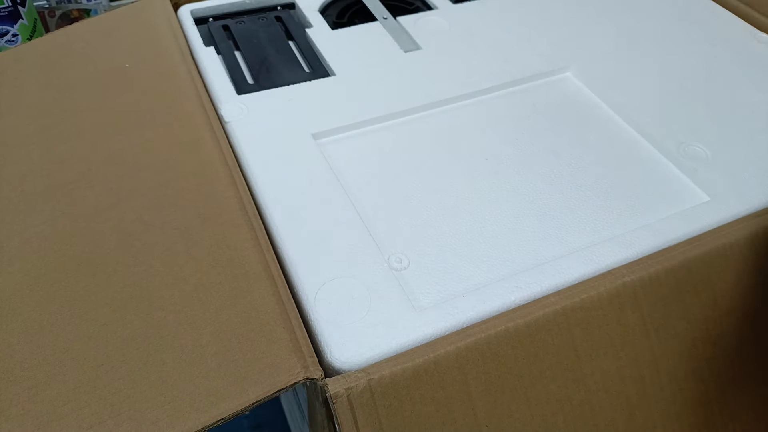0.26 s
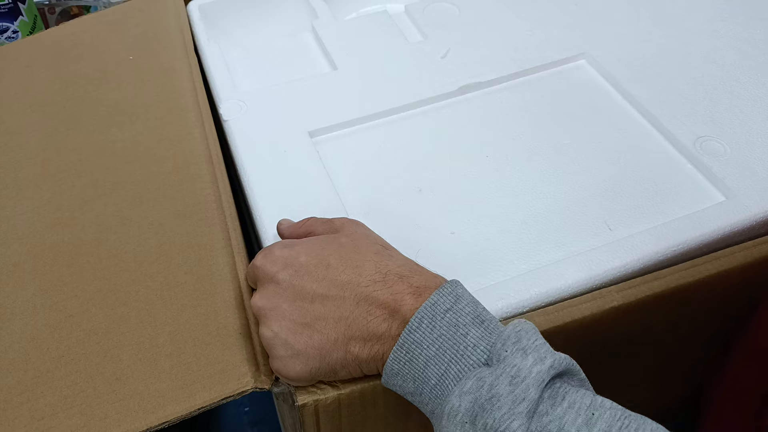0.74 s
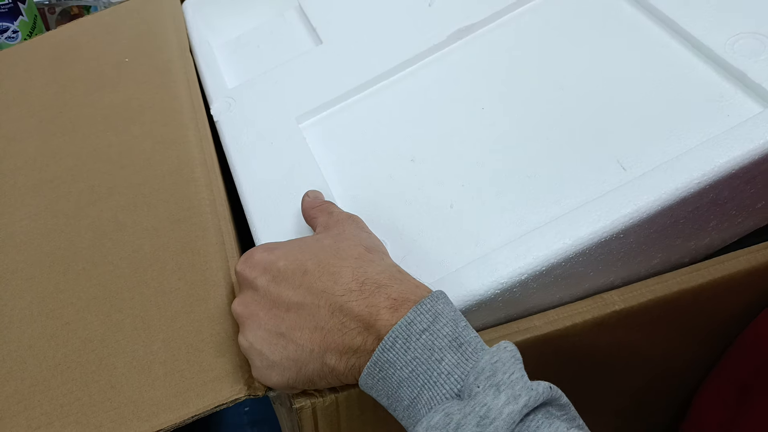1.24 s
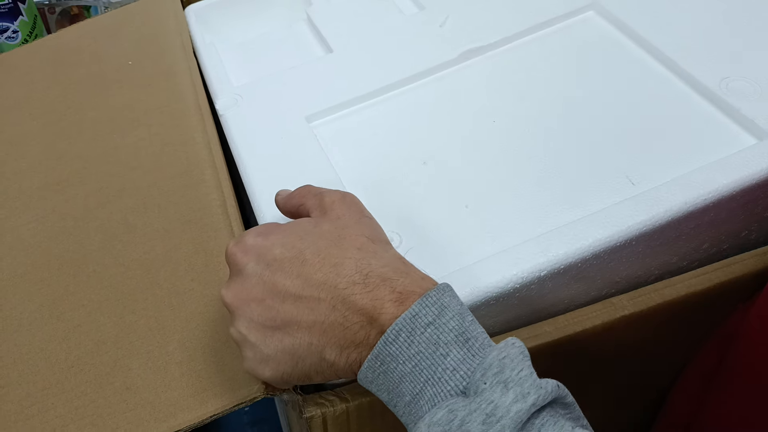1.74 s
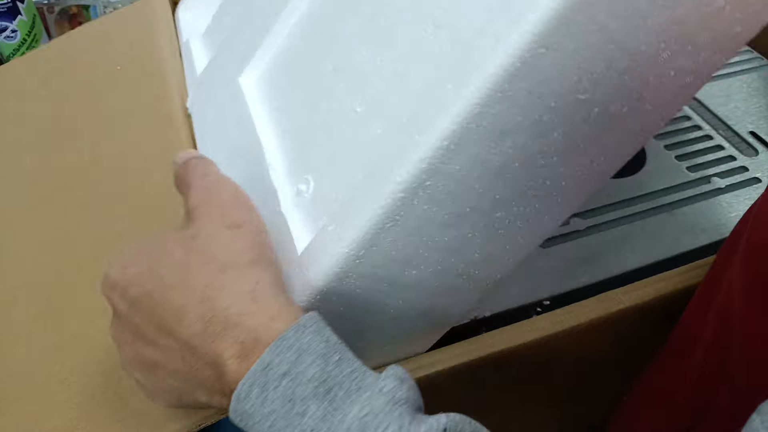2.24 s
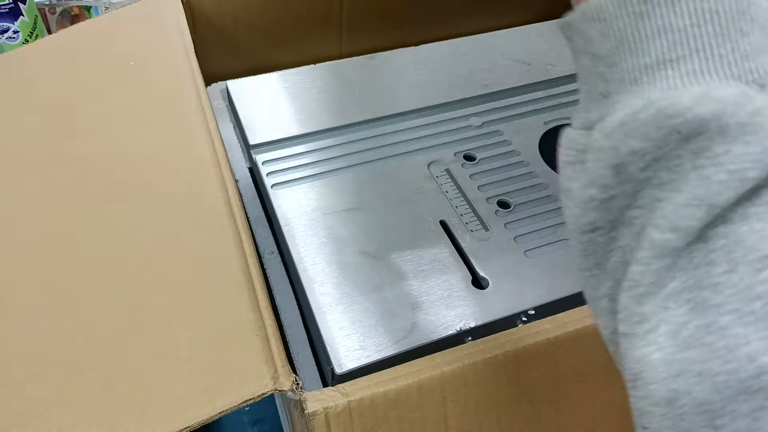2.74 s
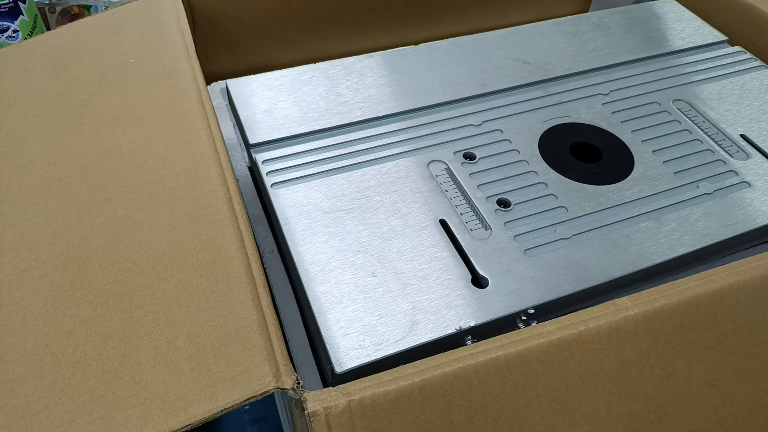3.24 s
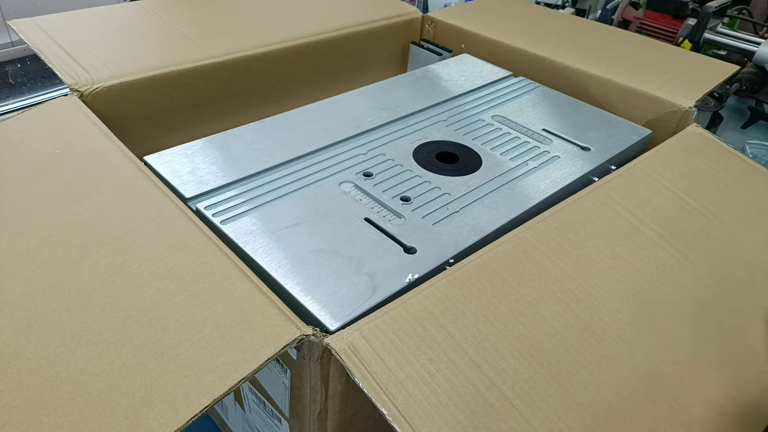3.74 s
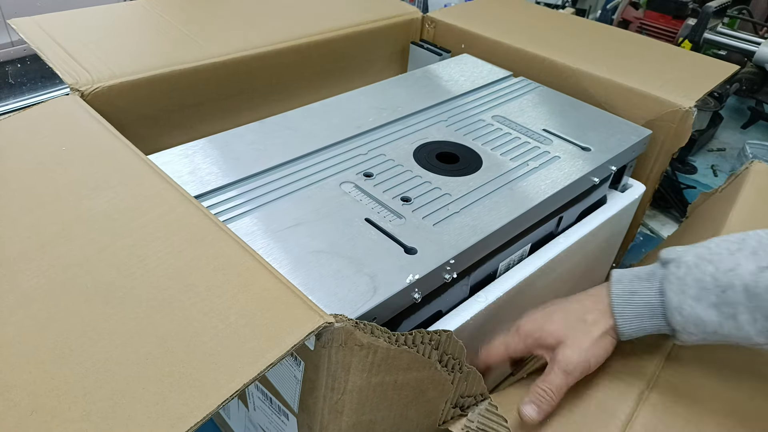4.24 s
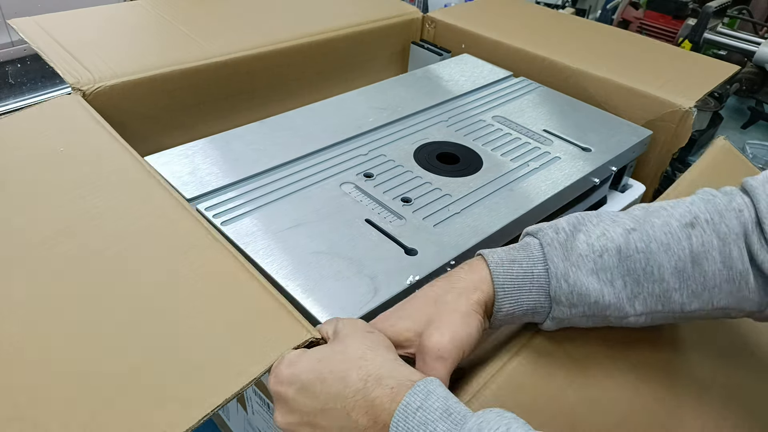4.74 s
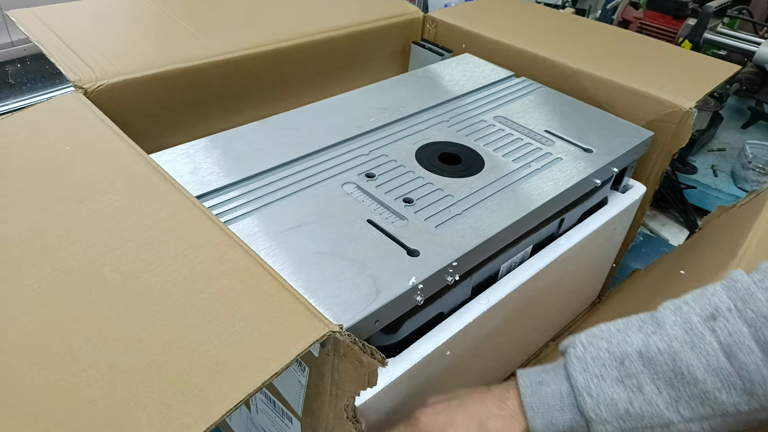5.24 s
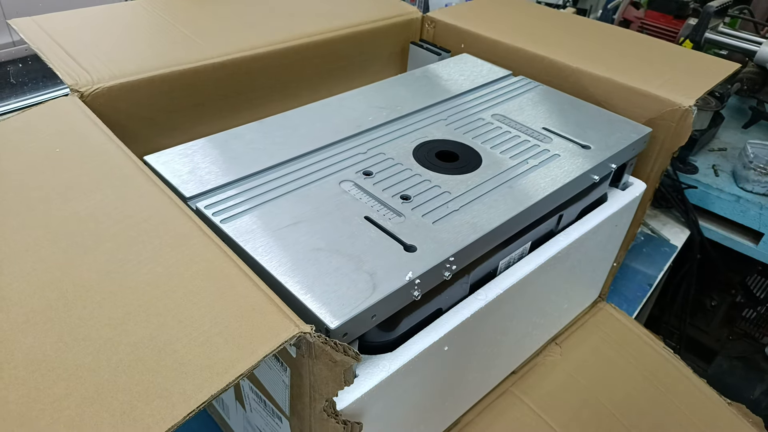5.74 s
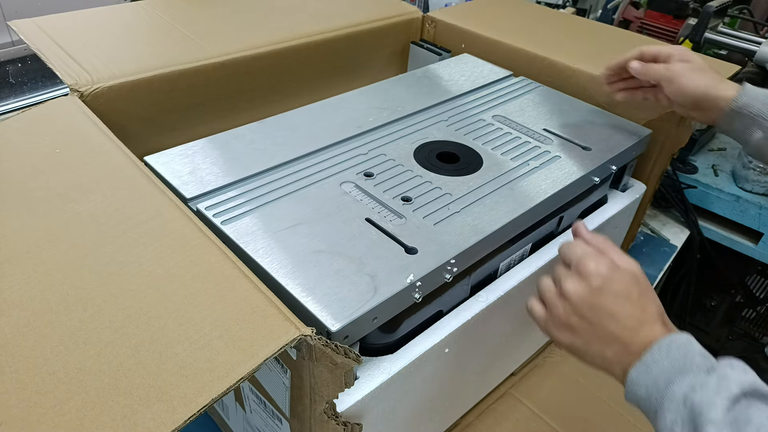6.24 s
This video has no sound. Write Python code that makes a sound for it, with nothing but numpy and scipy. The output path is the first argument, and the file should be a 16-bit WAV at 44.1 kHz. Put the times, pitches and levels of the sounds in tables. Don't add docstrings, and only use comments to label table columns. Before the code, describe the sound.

Dry, squealing foam scrapes free of a hollow box and drops with clattering thuds; after a brief hush, a torn cardboard side is bent and pressed.

```python
import sys
import numpy as np
from scipy import signal
from scipy.fft import rfft, irfft, next_fast_len
from scipy.io import wavfile
from scipy.ndimage import uniform_filter1d

SR = 44100
rng = np.random.default_rng(int(sys.argv[2]) if len(sys.argv) > 2 else 0)


def invert_db(x):
    u = np.asarray(x, float) / 20
    return 10 ** u


def inscribe(sig):
    pcm = np.round(np.clip(np.atleast_2d(sig).T, -1, 1) * 32767)
    wavfile.write(sys.argv[1], SR, pcm.astype(np.int16))


N = 286164
LONG = next_fast_len(N)
BINS_HZ = np.fft.rfftfreq(LONG, 1 / SR)

# start in seconds, fade in seconds, force in dB, body above the force in dB, fizz above it in dB.
JOLTS = [(.081, 0.08, -40, -2, 5.5), (.478, 0.11, -43, 14, 5.5), (.717, 0.14, -27, -10, 7.5),
         (.866, 0.12, -31, -5, 17), (.987, 0.035, -39, -11, 25.5), (1.078, 0.073, -57, 10, 10),
         (1.312, 0.091, -51, 14, 34), (2.15, 0.13, -24.5, -1, 5.5), (2.323, 0.14, -28, -22, -7),
         (2.795, 0.19, -43.5, 15.5, -8), (2.822, 0.12, -38.5, 18, -9), (2.971, 0.13, -23.5, 11, -3),
         (3.231, 0.12, -31, 17.5, -4), (3.525, 0.17, -71.5, 16, 15), (3.737, 0.12, -47, 8, 2.5),
         (3.867, 0.11, -50, 23, -2), (4.29, 0.099, -36, 16, -3), (4.733, 0.05, -33.5, 2, -4),
         (4.921, 0.11, -23, -6, 7.5), (5.262, 0.093, -24, -17, 1), (6.349, 0.28, -56, -6.5, 9),
         (6.46, 0.11, -61, 4, 18)]
# peak time in seconds, then as for the jolts.
PULLS = [(.06, 0.067, -67, 11, 0), (.25, 0.63, -55, 2, 6), (.4, 0.26, -57.5, 11, 9),
         (.733, 0.023, -28, -10, 7), (.8, 0.12, -38, 1.5, 0.5), (.918, 0.12, -18.5, -14, -4.5),
         (.996, 0.012, -35.5, -11, 26.5), (1.03, 0.19, -42, 5.5, 18), (1.133, 0.065, -28, 5.5, 6.5),
         (1.21, 0.26, -43.5, 3.5, 19.5), (1.273, 0.098, -42, -6, 20.5), (1.357, 0.11, -34, -2.5, 18),
         (1.389, 0.11, -33, -21, -3), (1.442, 0.06, -57.5, 21, 0), (1.505, 0.29, -34, -4, 13),
         (1.612, 0.24, -24, -25, 8), (1.675, 0.064, -37, 6, 27.5), (1.765, 0.13, -31, -6.5, 14),
         (1.875, 0.28, -24.5, -16, 9), (1.987, 0.19, -48, -3.5, 34.5), (2.08, 0.15, -38.5, 4.5, 15.5),
         (2.239, 0.22, -24, -10.5, 8), (2.372, 0.25, -23.5, 2.5, -1.5), (2.542, 0.24, -38, -9, 8),
         (2.652, 0.16, -29.5, -2, 4)]
# peak time in seconds, then as for the jolts.
TUMBLES = [
    (2.882, 0.11, -49.5, 32, -17.5),
    (3.02, 0.095, -29, 16.5, -4.5),
    (3.06, 0.12, -43, 28, -6.5),
    (3.133, 0.14, -35.5, 24.5, 2.5),
    (3.3, 0.19, -46, 31, -16),
    (3.383, 0.046, -29, 11, 3.5),
]
# peak time in seconds, then as for the jolts.
FOLDS = [(3.64, 1, -64, 9, 2), (3.905, 0.051, -36.5, 13.5, 2), (3.949, 0.07, -26.5, 2.5, 1),
         (4.011, 0.17, -25.5, -0.5, 3), (4.089, 0.15, -23.5, -3.5, 4.5), (4.149, 0.19, -29.5, -4.5, 2),
         (4.35, 0.14, -44, 13, 8.5), (4.425, 0.18, -32.5, -6.5, 4.5), (4.572, 0.19, -37.5, 3, 3.5),
         (4.845, 0.34, -34.5, -2.5, 5.5), (4.974, 0.18, -23, 2.5, -1.5), (5.049, 0.27, -36, 4.5, 11.5),
         (5.116, 0.1, -42.5, -9, 13.5), (5.2, 0.12, -35.5, 1, -10), (5.301, 0.15, -24, -5, 5),
         (5.345, 0.15, -29, 6, 3.5), (5.49, 0.66, -41.5, -1.5, 8), (5.58, 0.7, -52.5, 9, 8),
         (5.742, 0.11, -38.5, -1.5, 0.5), (5.823, 0.22, -43, -6, 7), (5.96, 0.28, -56.5, 7.5, 6),
         (6.1, 0.25, -73, -15.5, 7), (6.489, 0.06, -48, 4, 2)]
FADE_SHARES = [0.81, 0.75, 0.8]
# time in seconds, thump above the body in dB, left over right in dB.
HANDS = [(0.0, -7, 1), (1.16, -17.5, -1.5), (2.29, -15.5, 1), (2.5, -5, 0.5), (2.71, -12, 0.5),
         (2.78, 4, -1), (2.8, -12.5, -0.5), (3.42, -24, -0.5), (3.85, -2.5, -3), (3.94, -30, 0),
         (4.32, -20.5, 0), (4.6, -11, 0), (5.0, -10.5, 0), (5.35, -24.5, 0), (5.55, -12, -0.5),
         (6.38, -11, -1.5), (6.49, 2.5, -1.5)]
# time in seconds, share of ringing foam 0-1, share of dull side panel 0-1.
SHAKEN = [(0, 0.6, 0.18), (.7, 0, 0.24), (2.7, 0.2, 0.2), (2.8, 0.83, 0.05), (3.4, 0.99, 0.18),
          (3.5, 0, 0.15), (3.75, 0, 0.47), (4.3, 0.1, 0.65), (4.5, 0.35, 0.38), (4.7, 0, 0.16),
          (5.9, 0.4, 0.26)]
# time in seconds, share of thin top fizz 0-1.
SPEED = [(.7, 0.2), (1.0, 0), (1.1, 0.7), (1.2, 0.6), (1.3, 0.85), (1.4, 0.1), (1.46, 1), (1.5, 0.3),
         (1.56, 0.54), (1.62, 0), (1.69, 0.9), (1.76, 0.1), (1.88, 0), (1.95, 0.37), (2.03, 0.7),
         (2.2, 0.03), (2.7, 0.2), (3.5, 0.25)]
# middle in seconds, half length in seconds, change in dB.
LIFTS = [(1.06, 0.0099, 6), (1.225, 0.04, 1), (1.295, 0.035, -16), (1.092, 0.014, -9), (1.33, 0.014, -3),
         (1.468, 0.03, -12), (1.564, 0.026, -12), (1.714, 0.047, -11), (1.776, .012, -7),
         (1.924, 0.029, -6), (2.028, 0.042, -11), (2.143, 0.0058, -5), (2.488, 0.022, -5.5),
         (2.59, 0.014, -6), (2.96, 0.024, -9), (3.21, .014, 2.5)]
# pitch in Hz, level in dB per Hz.
THUMP = [(25, -39), (60, -34.5), (100, -3.5), (130, 3.5), (200, -2.5), (250, -27), (350, -33)]
# pitch in Hz, level in dB per Hz.
BODY = [(150, -47), (230, -3.5), (300, 1), (600, 2), (900, 0), (1300, -5.5), (2000, -13), (3500, -32.5)]
# pitch in Hz, level in dB per Hz.
PANEL = [(110, -27.5), (190, -9.5), (290, 0), (400, -15.5), (560, -23.5), (900, -27.5), (1500, -46)]
# pitch in Hz, level in dB per Hz.
RASP = [(140, -46.5), (700, -10), (1200, -2.5), (1600, -1.5), (3000, -1.5), (5500, -6), (6500, -12),
        (8500, -19)]
# pitch in Hz, level in dB per Hz.
FIZZ = [(4000, -41.5), (6000, -9), (8000, -2), (10500, -1), (13000, -2), (15700, -9), (16100, -46)]
# pitch in Hz, level in dB per Hz.
SHEEN = [(6500, -47), (8500, -14), (10000, -2), (13000, -2.5), (15700, -5.5), (16100, -32)]
# pitch in Hz, width in Hz, height above the body in dB.
HOLLOW = [(160, 18, 12), (295, 24, 13), (409, 14, 17), (540, 14, 16), (667, 14, 16), (837, 14, 16),
          (1098, 20, 12), (1410, 16, 12)]
# pitch in Hz, likeness from -1 to 1.
LIKENESS = [(60, 0.35), (150, 0.97), (380, 0.91), (950, 0.62), (2380, 0.039), (5980, -0.011),
            (15000, -0.17)]
# start in seconds, length in seconds, pitch in Hz, level in dB.
SQUEAKS = [(0.831, 0.025, 9620, -25), (0.874, 0.046, 12460, -20.5), (0.885, 0.036, 8380, -24.5),
           (0.988, 0.06, 4690, -31.5), (1.093, 0.012, 14200, -18.5), (1.37, 0.083, 5620, -31.5),
           (1.187, 0.063, 10500, -34), (1.122, 0.013, 12400, -17.5), (1.165, .01, 11500, -25),
           (1.184, 0.013, 7720, -20), (1.207, 0.05, 7740, -28), (1.182, .08, 5340, -33.5),
           (1.255, 0.06, 6050, -34), (1.319, 0.019, 11600, -19), (1.34, 0.02, 10600, -25),
           (1.387, .009, 5610, -20), (1.664, 0.03, 13490, -11.5), (1.801, 0.019, 5220, -20),
           (1.845, 0.02, 13600, -32), (1.953, 0.037, 10570, -14.5), (2.028, 0.011, 12000, -23.5),
           (2.063, 0.023, 11720, -17.5), (1.746, 0.02, 5420, -23.5), (2.648, 0.017, 13600, -17),
           (2.978, 0.049, 4500, -26)]
# start in seconds, length in seconds, first pitch in Hz, last pitch in Hz, level in dB.
CHIRPS = [(0.86, 0.01, 14330, 4980, -21.5), (1.078, .006, 8830, 15100, -20),
          (1.114, 0.013, 14460, 13500, -19), (1.144, 0.018, 11970, 13100, -20),
          (1.184, 0.01, 11200, 9900, -22.5), (1.25, .011, 13000, 15600, -21),
          (1.267, 0.0088, 8000, 12830, -21), (1.273, 0.012, 12500, 9270, -20),
          (1.31, 0.01, 9190, 11570, -18), (1.354, 0.01, 10500, 3920, -22),
          (1.366, 0.013, 3880, 3020, -25.5), (1.371, 0.055, 3127, 2750, -30),
          (1.381, .012, 3700, 2720, -25), (1.427, 0.017, 7470, 15500, -17.5),
          (1.477, 0.013, 15300, 10360, -22), (1.485, 0.014, 9500, 3870, -23),
          (1.527, 0.013, 8840, 11460, -17), (1.535, 0.0095, 12440, 14100, -20),
          (1.599, 0.018, 1380, 1210, -29.5), (1.611, 0.017, 1138, 980, -24),
          (1.653, 0.014, 10800, 13600, -20.5), (1.691, .01, 13000, 14900, -24),
          (1.695, 0.028, 11660, 10860, -19), (1.716, 0.011, 9960, 7800, -26),
          (1.743, 0.01, 4180, 5670, -27.5), (1.752, .01, 8200, 10700, -27), (1.757, 0.015, 6880, 7510, -20),
          (1.863, 0.028, 3544, 4660, -25), (1.926, 0.025, 4106, 7900, -21),
          (1.945, 0.013, 11000, 13200, -44), (1.978, .012, 12430, 13800, -24),
          (1.98, 0.0086, 11950, 15250, -25), (2.022, 0.0072, 12670, 8200, -23.5),
          (2.04, 0.018, 14160, 10340, -22.5)]
# start in seconds, peak in dB.
SNAPS = [(.0807, -26), (.157, -36), (.4777, -27), (.835, -12), (.9885, -5), (1.0805, 1), (1.119, -6),
         (1.129, -4), (1.1604, -9), (1.315, -20), (1.449, -10), (1.479, -14), (2.1495, 1), (2.186, -6),
         (2.202, -7), (2.234, -6), (2.3235, 3), (2.638, -8), (2.6491, -8), (2.6747, -18), (2.972, -8),
         (2.9863, -3), (3.231, -10)]
# start in seconds, peak in dB.
FIBRES = [(3.741, -30), (3.8977, -17), (3.937, -14), (3.9945, -10), (4.0274, -8), (4.0504, -11),
          (4.0884, -8), (4.417, -14), (4.732, -6), (4.9212, -3), (5.0836, -10), (5.1928, 1), (5.2625, -4),
          (5.2905, -12), (5.8053, -20), (6.0294, -29)]
# start in seconds, peak in dB, pitch in Hz.
KNOCKS = [(0.203, -32.5, 221), (0.278, -19.5, 196), (0.362, -29, 261), (0.477, -11.5, 450),
          (0.883, -13, 796), (1.122, -22, 513), (1.44, -24, 305), (1.672, -23, 209), (2.145, -14, 910),
          (2.324, -10, 926), (2.35, -3.5, 684), (2.885, -15, 560), (3.032, -1, 822), (3.12, -8, 684),
          (3.143, -12, 543), (3.365, -11, 429), (3.248, 0, 838.4)]
# start in seconds, peak in dB, pitch in Hz.
FLAP_KNOCKS = [(3.737, -27.5, 295), (3.865, -19.5, 488), (3.941, -33, 370), (4.292, -5, 340.3),
               (4.733, -21, 680), (4.837, -16, 725), (4.964, -7.5, 547), (5.58, -27, 322.7),
               (5.731, -29, 205), (5.967, -34.5, 137), (6.109, -40.5, 190.7), (6.351, -43, 252),
               (6.459, -42, 145)]
# start in seconds, peak in dB, pitch in Hz.
CRACKS = [(.207, -29.5, 890), (.082, -30, 667), (.72, -24, 795), (.881, -11.5, 597), (.955, -14.5, 757),
          (1.129, -17.5, 595), (1.161, -18.5, 930), (1.45, -22.5, 386), (1.479, -32, 504),
          (1.672, -19.5, 696), (1.748, -27, 394), (1.797, -16.5, 1630), (1.826, -12.5, 1620),
          (2.079, -15.5, 1090), (2.149, -10, 1300), (2.187, -9, 1240), (2.202, -8.5, 1210),
          (2.234, -11, 2420), (2.324, 0.5, 1480), (2.354, -8.5, 697), (2.639, -13, 1440), (2.807, -23, 740),
          (2.827, -26.5, 336), (2.972, -15, 330), (2.974, -12, 1670), (2.989, -3, 2400), (3.229, -10, 368),
          (3.23, -5, 1820), (3.87, -24, 473), (3.898, -18.5, 332), (3.899, -20.5, 1430), (3.94, -13.5, 358),
          (3.995, -14.5, 900), (4.029, -22, 1590), (4.052, -15, 690), (4.301, -8, 378), (4.805, -38, 684),
          (4.922, -21, 1320), (4.93, -8, 720), (4.945, -12, 770), (5.084, -17, 462), (5.193, -23, 547),
          (5.237, -28, 633), (5.263, -10, 2300), (5.297, -11.5, 650), (5.319, -7.5, 1310)]
# start in seconds, length in seconds, pitch in Hz, level in dB.
GROANS = [(1.96, 0.15, 300, -45), (2.26, 0.05, 285, -31), (3.733, 0.082, 275, -40.5),
          (3.976, 0.058, 310, -29), (4.075, 0.071, 300, -32), (4.403, .09, 290, -42.5),
          (5.5, 0.083, 600, -47), (5.617, .14, 610, -43.5), (5.64, 0.14, 310, -50), (5.979, 0.09, 185, -49),
          (6.343, 0.039, 330, -52)]
# pitch in Hz, level in dB per Hz.
HISS = [(30, -32.5), (71, -10), (170, -14.5), (400, -24), (800, -27.5), (1300, -19), (5500, -25.5),
        (9000, -17.5), (16000, -17)]
# start in seconds, end in seconds, level in dB.
HUSH = (3.394, 3.518, -36.5)


def evened(x):
    return x / np.sqrt(np.mean(x ** 2) + 1e-20)


def read(points, hz):
    f, value = np.transpose(points)
    return np.interp(np.log(hz + 1), np.log(f + 1), value)


def colour(points):
    return invert_db(read(points, BINS_HZ))


def follow(table):
    s, *columns = np.transpose(table)
    return [np.interp(np.arange(N) / SR, s, c) for c in columns]


def add(mix, s, sound):
    part = mix[:, round(s * SR):][:, :sound.shape[-1]]
    part += sound[..., :part.shape[1]]


def sides(pan_db):
    return invert_db(np.array([.5, -.5])[:, None] * pan_db)


def pair(drive, gains, patchy_db):
    _, _, z = signal.stft(drive * rng.standard_normal((2, N)), SR, nperseg=256)
    patches = rng.standard_normal(z.shape[::-1][:2]).T
    patches = uniform_filter1d(patches, size=8, axis=0)
    patches = uniform_filter1d(patches, size=7, axis=1)
    x = signal.istft(z * invert_db(patchy_db * evened(patches)), SR, nperseg=256)[1][:, :N]
    a, b = rfft(x, LONG)
    same = np.clip(read(LIKENESS, BINS_HZ), 0, 1)
    both = np.array([a, same * a + np.sqrt(1 - same ** 2) * b])
    return [evened(irfft(both * gain, LONG)[:, :N]) for gain in gains]


def rubbing():
    body_db, rasp_db, fizz_db = handling()
    weight_db, pan_db = follow(HANDS)
    coarse = slips(200, 2.2, .005, dense=2.2)
    fine = slips(220, 3.2, .0015, dense=2.8) * (2.5 + coarse)

    ringing = hollow(BINS_HZ)
    body_colours = [colour(THUMP) * ringing, colour(BODY), colour(BODY) * ringing, colour(PANEL)]
    thump, board, slab, panel = pair(coarse, body_colours, 0.8)
    slab_share, panel_share = np.clip(follow(SHAKEN), 0, 1)
    board_share = np.clip(1 - slab_share - panel_share, 0, 1)
    body = slab_share * slab + panel_share * panel + board_share * board

    rasp, wide, thin = pair(fine, [colour(RASP), colour(FIZZ), colour(SHEEN)], 1.84)
    fast = np.clip(follow(SPEED)[0], 0, 1)
    fizz = (1 - fast) * wide + fast * thin

    out = invert_db(body_db + weight_db) * thump + invert_db(body_db - 1.0) * body
    out = out + invert_db(rasp_db + lifting()) * rasp + invert_db(fizz_db - 3.0) * fizz
    return out * sides(pan_db)


def handling():
    t = np.arange(0, N + SR, 44) / SR
    power = strokes(JOLTS, t, True) + strokes(PULLS + TUMBLES + FOLDS, t, False) + 1e-12
    return [np.interp(np.arange(N) / SR, t, 10 * np.log10(p)) for p in power]


def strokes(table, t, sudden):
    s, fade_s, force_db, body_db, fizz_db = np.transpose(table)[:, :, None]
    jolt_rise_s = 0.0028
    rise_s = jolt_rise_s if sudden else 0.73 * fade_s
    late = t - s - sudden * jolt_rise_s
    hush_from, hush_to, _ = HUSH
    cut_db = np.where((t > hush_from) & (s < hush_from), -61 - 900 * (t - hush_from), 0)
    cut_db[(t < hush_to) & (s > hush_from)] = -200
    power = []
    for above_db, share in zip([body_db, 0, fizz_db], FADE_SHARES):
        away = np.where(late < 0, -late / rise_s, late / (fade_s * share))
        level_db = force_db + above_db + cut_db - 23 * away ** 1.243
        power.append((invert_db(level_db) ** 2).sum(0))
    return np.array(power)


def slips(per_s, spread_db, ring_s, dense):
    size_db = spread_db * np.minimum(rng.exponential(1, N), 3)
    hits = invert_db(size_db) * (rng.random(N) < per_s / SR)
    return dense + evened(signal.lfilter([1], [1, -np.exp(-1 / (ring_s * SR))], hits))


def hollow(hz):
    return sum(invert_db(db) / np.sqrt(1 + (2 * (hz - f) / width) ** 2) for f, width, db in HOLLOW) + 1


def lifting():
    s, half_s, db = np.transpose(LIFTS)[:, :, None]
    t = np.arange(0, N + SR, 44) / SR
    return np.interp(np.arange(N) / SR, t, (db * np.exp(-((t - s) / half_s) ** 4)).sum(0))


def squeak(length, start_hz, mid_hz, end_hz, db, jitter=.022, clean=.7, fuzz=.06, overtone_db=-11):
    u = np.linspace(0, 1, round(length * SR))
    hz = np.interp(u, [0, .5, 1], [start_hz, mid_hz, end_hz])
    shake = evened(uniform_filter1d(rng.standard_normal(len(u)), size=40))
    turns = np.cumsum(hz * (1 + jitter * shake)) / SR
    a, b = rng.standard_normal((2, 2, len(u)))
    keep = np.exp(-np.pi * fuzz * mid_hz / SR)
    beads = signal.lfilter([np.sqrt(1 - keep ** 2)], [1, -keep], a + 1j * b)
    tone = 0
    for k in (1, 2, 3):
        tone = tone + invert_db(overtone_db * (k - 1)) * np.exp(2j * np.pi * k * turns) * (k * hz < 15800)
    return invert_db(db) * ((clean + beads) * tone).real * signal.windows.tukey(len(u), .4)


def blur(s, hz, jitter, clean, fuzz):
    more = 2.2 if s > 1.35 and hz < 8200 else 1
    return jitter, clean / more, fuzz * more


def squeaks():
    out = np.zeros((2, N))
    for s, length, hz, db in SQUEAKS:
        add(out, s, squeak(length, hz, hz, 0.95 * hz, db - 2.5, *blur(s, hz, .012, .9, .04)))
    for s, length, start_hz, end_hz, db in CHIRPS:
        mid_hz = (start_hz + end_hz) / 2
        add(out, s, squeak(length, start_hz, mid_hz, end_hz, db, *blur(s, end_hz, .016, .8, .05)))
    return out


def swarm(count=70):
    out = np.zeros((2, N))
    from_s, to_s = .86, 2.12
    for when, long, high, bend, end, size in rng.random((count, 6)):
        hz = 8000 * 1.75 ** np.sqrt(high)
        mid_hz, end_hz = hz * (.88 + .24 * bend), hz * (.8 + .36 * end)
        part = squeak(.006 + .02 * long, hz, mid_hz, end_hz, -29 - 8 * size + 5 * high)
        add(out, from_s + (to_s - from_s) * when, part)
    return out


def snaps(t60=.025):
    t, out = np.arange(SR // 20) / SR, np.zeros((2, N))
    for s, db in SNAPS + FIBRES:
        add(out, s, invert_db(db - 10.5 - 60 * t / t60) * rng.standard_normal((2, len(t))))
    brighter = signal.lfilter([1, -.3], [1], out)
    return signal.sosfilt(signal.butter(2, 320, "highpass", fs=SR, output="sos"), brighter)


def knock(db, hz, chance, cycles=32, rise_s=0.0021):
    t = np.arange(SR // 4) / SR
    ratios = np.array([.62, 1, 1.3, 1.8, 2.7]) * (1 + 0.22 * (chance - .5))
    levels_db = [-7, 3.5, -1.5, -6.0, -17.0]
    t60 = min(cycles / hz, .11)
    ring = 0
    for r, g in zip(ratios, levels_db):
        ring = ring + invert_db(g - 60 * t * np.sqrt(r) / t60) * np.sin(2 * np.pi * hz * r * t)
    return invert_db(db - 6.0) * ring[None] * (1 - np.exp(-t / rise_s))


def knocks():
    out = np.zeros((2, N))
    for s, length, hz, db in GROANS:
        hum = squeak(length, hz, hz, hz, db, jitter=.01, clean=.5, fuzz=.12, overtone_db=-25)
        add(out, s, hum.mean(0))
    for s, db, hz in KNOCKS + FLAP_KNOCKS:
        add(out, s + 0.0019, knock(db, hz, rng.random(5)))
    for s, db, hz in CRACKS:
        add(out, s, knock(db, hz, rng.random(5), cycles=21.0, rise_s=0.00085))
    return out


def room(x):
    taps = np.zeros((2, SR // 2))
    at = np.arange(100, SR // 2 - 20, 20)[None] + rng.integers(0, 20, (2, 1))
    at = at + rng.integers(-9, 1, at.shape)
    np.put_along_axis(taps, at, rng.choice([-1., 1.], at.shape), 1)
    hz, t, z = signal.stft(taps, SR, nperseg=256)
    t60 = read([(200, 0.11), (2000, 0.27), (12000, 0.051)], hz)[:, None]
    tail = signal.istft(z * invert_db(-60 * t / t60), SR, nperseg=256)[1]
    return signal.fftconvolve(x.mean(0)[None], tail / np.linalg.norm(tail[0]), axes=1)[:, :N]


def workshop():
    return invert_db(-61) * pair(1, [colour(HISS)], 1.4)[0]


def whine():
    t = np.arange(N) / SR
    waver = 1 + .25 * evened(uniform_filter1d(rng.standard_normal(N), size=900))
    level_db = -72.5 + np.interp(t, [HUSH[1], 4], [-5, 4])
    return invert_db(level_db) * waver * np.sin(2 * np.pi * 947.5 * t) * (t > HUSH[0])


def scene():
    rub = rubbing()
    sharp = squeaks() + swarm() + snaps() + knocks()
    t0, t1, db = HUSH
    hush_times = [t0 - .002, t0, t0 + 0.013, t1, t1 + 0.0091]
    hush = invert_db(np.interp(np.arange(N) / SR, hush_times, [0, db / 2, db, db, 0]))
    return (rub + sharp + invert_db(-8.5) * room(sharp)) * hush + workshop() * np.sqrt(hush) + whine()


def roll_off(x):
    return signal.sosfilt(signal.butter(12, 16790, fs=SR, output="sos"), x)


def record(dry):
    thin = signal.sosfilt(signal.butter(2, 62, "highpass", fs=SR, output="sos"), dry)
    treble_cut = signal.firwin(255, 15950, window=("kaiser", 8), fs=SR)[None]
    mix = signal.oaconvolve(np.tanh(thin), treble_cut, "same")
    return roll_off(mix)


dry = scene()
out = record(dry)
inscribe(out)
```